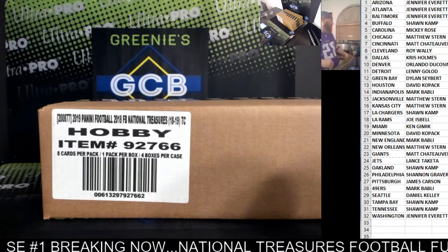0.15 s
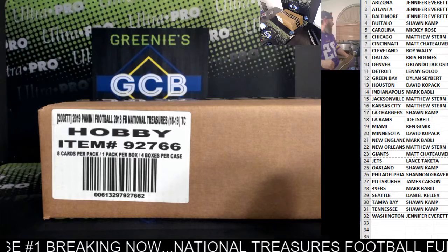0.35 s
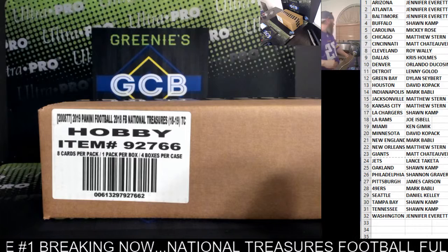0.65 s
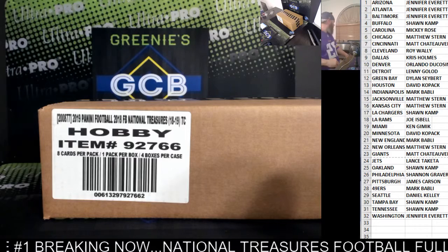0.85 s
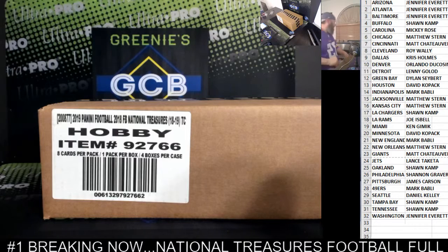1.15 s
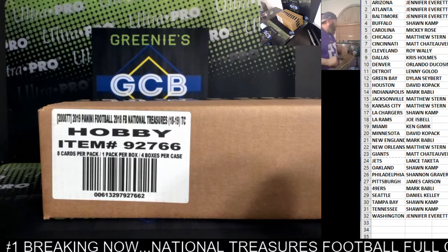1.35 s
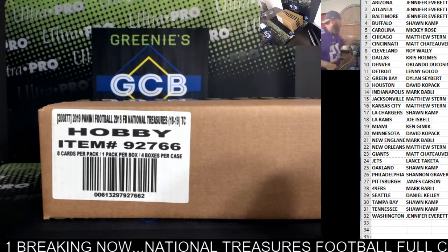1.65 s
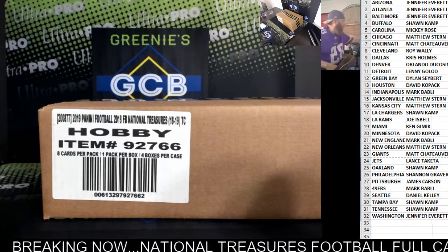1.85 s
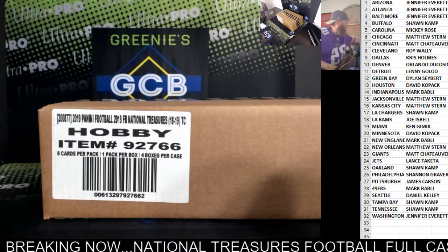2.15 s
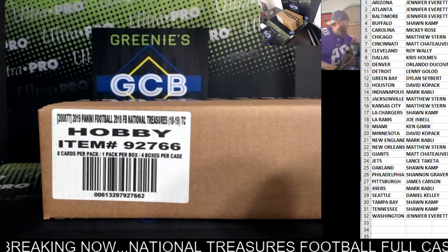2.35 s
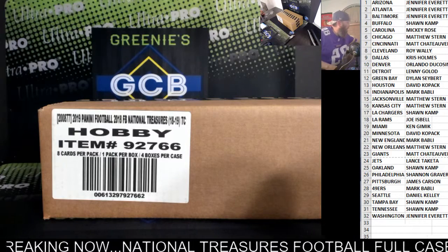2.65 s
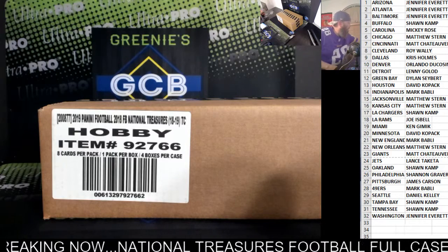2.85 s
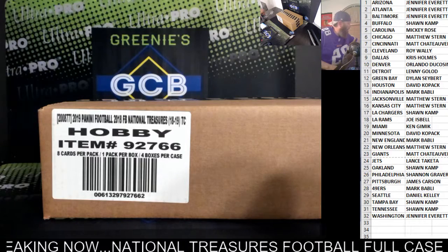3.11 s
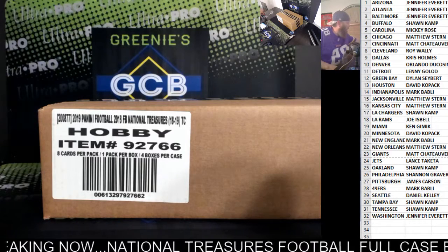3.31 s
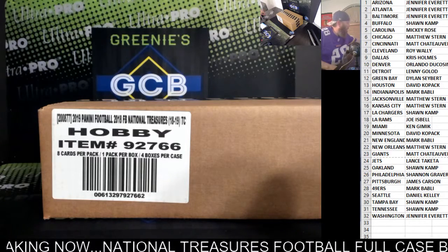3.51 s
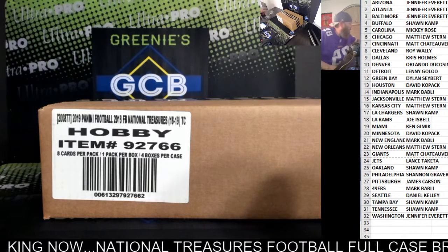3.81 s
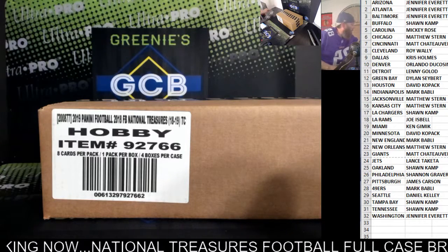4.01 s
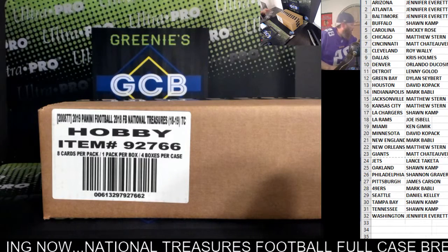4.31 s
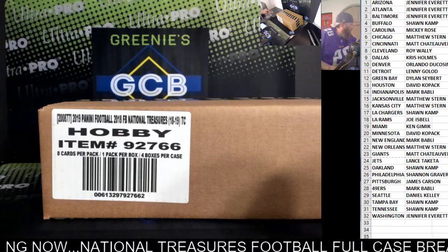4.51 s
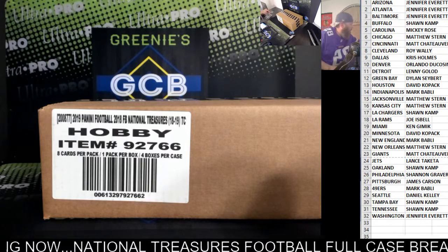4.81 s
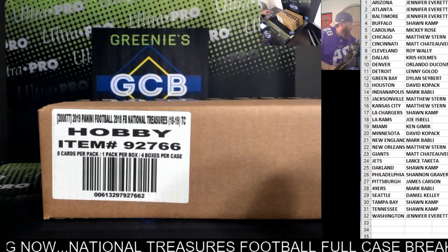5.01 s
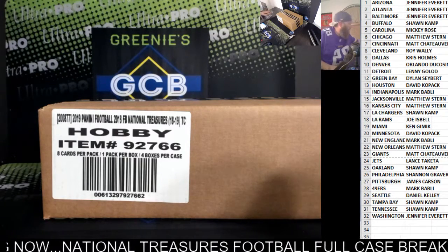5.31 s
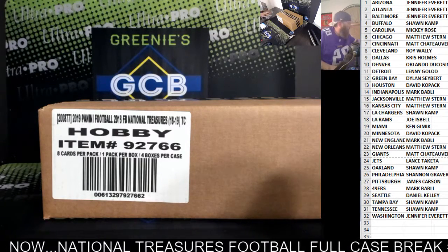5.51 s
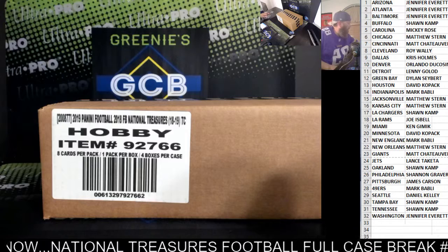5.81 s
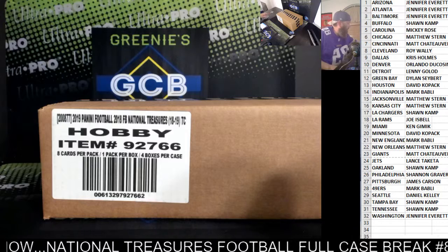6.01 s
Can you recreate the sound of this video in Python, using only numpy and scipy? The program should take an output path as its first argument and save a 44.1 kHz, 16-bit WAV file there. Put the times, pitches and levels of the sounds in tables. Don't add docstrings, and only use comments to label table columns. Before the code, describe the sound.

Quiet indoor air with a low, faint hum opens almost empty, broken by small ticks and a dull knock. Then hands shuffle light boxes and plastic cases on a desk: gritty slides, crisp clicks, small hollow bumps. It is busiest before four seconds, flares again shortly after, and finishes with gentle rubs, all heard close up with a short room echo.

```python
import sys
import numpy as np
from scipy import signal
from scipy.fft import rfft, irfft, next_fast_len
from scipy.io import wavfile
from scipy.ndimage import uniform_filter1d, map_coordinates

SR = 44100
rng = np.random.default_rng(int(sys.argv[2]) if len(sys.argv) > 2 else 0)


def volts_from_db(level):
    exponent = np.asarray(level, float) / 20
    return 10 ** exponent


def dump_mix(stems):
    frames = np.atleast_2d(stems).T
    limited = np.clip(frames, -1, 1)
    pcm = np.round(limited * 32767).astype(np.int16)
    wavfile.write(sys.argv[1], SR, pcm)


N = 271656


def unit(x):
    return x / np.sqrt(np.mean(x ** 2) + 1e-30)


def along(points, hz):
    f, v = np.transpose(points)
    return np.interp(np.log(hz + 1), np.log(f + 1), v)


def wobble(rate, n):
    knots = rng.standard_normal(int(n * rate / SR) + 4)
    return map_coordinates(knots, [np.arange(n) * rate / SR])


def resonance(f, hz, width):
    return 1 / (1 + (2 * (f - hz) / width) ** 2)


def coloured(x, gain):
    m = 2 * next_fast_len(len(x) // 2 + 8192)
    cep = irfft(np.log(gain(np.fft.rfftfreq(m, 1 / SR)) + 1e-6), m)
    cep[1:m // 2] *= 2
    cep[m // 2 + 1:] = 0
    return irfft(rfft(x, m) * np.exp(rfft(cep)), m)[:len(x)]


def tilted(f, gain, boom_db, rasp_db, sizzle_db):
    # low edge [f/Hz], high edge [f/Hz]
    bands = [(200, 900), (1000, 3000), (3500, 6500), (6800, 15000)]
    have = []
    for lo, hi in bands:
        power = np.sum(gain[(f > lo) & (f < hi)] ** 2, axis=0)
        have.append(np.sqrt(np.mean(power) / len(f)))
    knots = np.log([(lo * 1.15, hi / 1.15) for lo, hi in bands]).ravel()
    share = np.array([np.interp(np.log(f + 1), knots, np.repeat(row, 2)) for row in np.eye(len(have))]).T
    want = np.array([boom_db, 0 * boom_db, rasp_db, sizzle_db]).reshape(len(have), -1)
    return gain * volts_from_db(share @ (want - 20 * np.log10(have)[:, None]))


def floor():
    # [f/Hz], [level/dB per Hz]
    hiss_colour = [(60, -12), (95, -15), (125, -9), (165, -17), (230, -16), (400, -28), (600, -33),
                   (1150, -26), (1800, -37), (3000, -42.5), (7000, -43.5), (16000, -44)]
    # [t/s], [level/dB]
    air_drift = [(0, 1.5), (2, 2), (4, 1.5), (4.7, 0), (6.16, 0)]
    # [f/Hz], width [f/Hz], [level/dB]
    fan_lines = [(119.5, 4.5, -86), (212.5, 41, -98.5), (354.2, 32, -106)]
    hiss_db = -92.5
    air = coloured(rng.standard_normal(N), lambda f: volts_from_db(along(hiss_colour, f)))
    above = signal.sosfilt(signal.butter(4, 500, "high", fs=SR, output="sos"), air)
    drift_db = np.interp(np.arange(N) / SR, *np.transpose(air_drift)) + .6 * wobble(2, N)
    out = volts_from_db(hiss_db + drift_db) * air / above.std()
    for hz, width, db in fan_lines:
        hum = unit(coloured(rng.standard_normal(N), lambda f: resonance(f, hz, width)))
        out += volts_from_db(db + 2.4 * wobble(2.8, N)) * hum
    return out


def draught():
    # [t/s], [level/dB]
    pressure = [(0.0, -59.5), (0.74, -46.5), (1.1, -53.5), (1.59, -36), (1.68, -58), (1.82, -40.5),
                (2.04, -52), (2.38, -57.5), (2.45, -63), (2.88, -49), (3.72, -47), (3.91, -32.5),
                (3.96, -45), (4.84, -54.5), (4.99, -43.5), (5.49, -52), (6.02, -37), (6.16, -54)]
    # [f/Hz], [level/dB per Hz]
    sway_colour = [(1, -20.5), (4, 5.5), (14, -1.5), (25, -16.5), (50, -42)]
    # [f/Hz], [level/dB per Hz]
    flutter_colour = [(20, -22.5), (32, 0), (60, -14.5), (100, -30), (200, -50.5)]
    # start [t/s], length [t/s], [level/dB]
    gusts = [(0.543, 0.18, -64.5), (1.277, 0.05, -76), (1.419, 0.52, -57.5), (1.878, 0.096, -60.5),
             (3.125, 0.15, -53), (3.362, 0.039, -64), (3.42, 0.059, -56), (3.54, 0.025, -57.5),
             (3.724, 0.21, -64), (4.28, 0.11, -54.5), (4.978, 0.076, -65.5), (5.107, 0.092, -64),
             (5.58, 1, -57.5)]
    flutter_db, eddy_db = -26, 2
    swing_limit = 1.6
    t = np.arange(N) / SR
    push = volts_from_db(np.interp(t, *np.transpose(pressure)))
    sway_curve, flutter_curve = [*sway_colour, (400, -120)], [*flutter_colour, (800, -120)]
    sway = unit(coloured(rng.standard_normal(N), lambda f: volts_from_db(along(sway_curve, f))))
    flutter = coloured(rng.standard_normal(N), lambda f: volts_from_db(along(flutter_curve, f)))
    flutter = unit(flutter * volts_from_db(4.0 * wobble(13, N)))
    eddies = np.zeros(N)
    for s, span, db in gusts:
        eddies += volts_from_db(db + eddy_db) * np.exp(-((t - s - span / 2) / (0.5 * span)) ** 2)
    swing = swing_limit * np.tanh(sway / swing_limit)
    return push * swing + (volts_from_db(flutter_db) * push + eddies) * flutter


def room(x, piece=.25):
    # [f/Hz], T60 [t/s]
    decay = [(200, 0.67), (500, 0.39), (1400, 0.38), (4000, 0.3), (10000, 0.19)]
    out, step = np.zeros(N + 2 * SR), round(piece * SR)
    for start in range(0, N, step):
        hz, t, z = signal.stft(rng.standard_normal(SR // 2), SR, nperseg=256)
        tail = signal.istft(z * volts_from_db(-60 * t / along(decay, hz)[:, None]), SR, nperseg=256)[1]
        wet = signal.fftconvolve(x[start:start + step], tail / np.linalg.norm(tail))
        out[start + 150:][:len(wet)] += wet
    return out[:N]


def taps():
    # [t/s], peak [level/dB], ring [f/Hz], T60
    # [t/s], click [level/dB]
    ticks = [(.258, -78, 11300, .0075, -10), (.349, -73, 12900, .0045, -14),
             (.381, -68.5, 10100, .016, -18), (1.06, -73, 7040, .003, -12), (1.2531, -46, 2000, .003, -15),
             (1.2531, -57, 4000, .003, -18), (1.2531, -43, 1300, .008, -30), (1.262, -58, 1270, .014, -20),
             (1.2675, -58, 1800, .012, -6), (1.8282, -64, 360, .03, -23), (3.321, -57, 11000, .002, -4),
             (3.347, -58, 12000, .003, -8), (3.69, -60, 255, .06, -20), (4.0737, -73, 580, .034, -24),
             (4.447, -58, 900, .02, -10), (5.09, -85, 8620, .02, -11)]
    # [t/s], peak [level/dB], ring [f/Hz], T60 [t/s],
    # click [level/dB]
    thuds = [
        (2.5871, -46, 1140, 0.014, -7),
        (3.07, -53, 1496, 0.065, -9),
        (3.2, -61.5, 776, 0.014, -7),
        (3.6886, -49.5, 606, .012, -6),
        (3.716, -51, 520, 0.011, -8),
        (3.7356, -69, 700, 0.0067, -6),
        (4.556, -60, 885, .012, -11),
        (5.619, -50.5, 440, 0.0079, -14),
        (5.78, -68, 1190, 0.013, -8),
    ]
    out, t = np.zeros(N + SR), np.arange(SR // 10) / SR
    dull = signal.butter(1, [900, 3800], "band", fs=SR, output="sos")
    for s, db, ring_hz, t60, click_db in [*ticks, *thuds]:
        ring = np.sin(2 * np.pi * ring_hz * t) * volts_from_db(-60 * t / t60)
        no_bass = signal.butter(2, ring_hz / 2, "high", fs=SR, output="sos")
        ring = signal.sosfilt(no_bass, ring)
        contact = rng.standard_normal(len(t)) * volts_from_db(-60 * t / .002) + 4 * (t == 0)
        click = signal.sosfilt(dull, contact)
        out[round(s * SR):][:len(t)] += volts_from_db(db) * (ring + volts_from_db(click_db) * click / np.abs(click).max())
    return out[:N]


def snaps():
    # [t/s], peak [level/dB], rasp [level/dB], sizzle [level/dB]
    edges = [(2.126, -72, -11, -31), (2.1931, -80, 0, -12), (2.2198, -60.5, 8, -2), (2.226, -62, 9, 4.5),
             (2.2329, -61, 6, 4), (2.345, -77, -8, -1), (2.3619, -55.5, -11, -15),
             (2.4125, -63.5, 3.5, 6.5), (2.5323, -83, 9, -10), (2.548, -73, -3, -20),
             (2.5606, -58, -3, -20), (2.5622, -49, -15, 0.5), (2.5871, -56, -4, 0.5),
             (2.6037, -51, -11, -15), (2.6186, -59, 2, -3.5), (2.8986, -70, 0, -5), (2.9113, -69, 4.5, -10),
             (2.9452, -74, 6, -4), (2.9636, -66, 3, -8), (3.048, -66, -2, -8), (3.176, -77, -2, -7),
             (3.1945, -62, 0, -7), (3.3033, -50, -1.5, -1.5), (3.4046, -52, -3, -1),
             (3.4435, -58.5, -7, -17), (3.6714, -62, 0, 1), (3.68, -58, 3, 0), (3.6884, -55.5, 2.5, 6.5),
             (3.7158, -53, 2, -8), (3.7357, -56, -6, 4), (4.1172, -65, 6, 3), (4.136, -68, 2, 7),
             (4.142, -69, -1, -1), (4.4424, -60, -19, -29), (4.4478, -60.5, -10, -2), (4.454, -52, -1, 5),
             (4.5259, -60, -2, -7), (4.5547, -61, 2, 0.5), (5.3452, -58.5, 9.5, 3), (5.495, -68, 1, -21),
             (5.4984, -71, 4.5, -20), (5.5503, -74, 9, -18), (5.6189, -65, 6.5, 3.5), (5.78, -67, -7, -18),
             (5.8195, -74, 0, -7), (5.8773, -61, 1, -8.5), (5.9345, -66, -19, -33), (6.087, -68, -1, 2)]
    # [f/Hz], [level/dB per Hz]
    crackle_colour = [(88, -20), (150, -22), (275, -14), (1980, -25), (2600, -28), (4240, -21.5),
                      (6260, -19), (8070, -14.5), (11700, -26), (13700, -33), (16000, -36)]
    t60, boom_db = 0.023, np.array(-5.5)
    out, t = np.zeros(N + SR), np.arange(SR // 10) / SR
    for s, db, rasp_db, sizzle_db in edges:
        burst = rng.standard_normal(len(t)) * volts_from_db(-60 * t / t60) + 2.55 * (t == 0)

        def colour(f):
            return tilted(f, volts_from_db(along(crackle_colour, f))[:, None], boom_db, rasp_db, sizzle_db)[:, 0]

        crack = coloured(burst, colour)
        out[round(s * SR):][:len(t)] += volts_from_db(db + 15.5) * crack / np.linalg.norm(burst)
    return out[:N]


def sheen(x):
    # [f/Hz], width [f/Hz], [level/dB]
    high_bands = [(7600, 230, 6.5), (8630, 120, 6.5), (10200, 390, 4.5), (11180, 190, 2.5),
                  (12230, 280, 11.5), (13570, 270, 16), (14200, 190, 5), (14800, 230, 13.5)]

    def gain(f):
        return np.sqrt(1.99 + sum(volts_from_db(1.5 + db) ** 2 * resonance(f, hz, width) for hz, width, db in high_bands))

    return coloured(x, gain)


def strokes():
    # start [t/s], rise [t/s], hold [t/s], pressure [level/dB], brightness [level/dB]
    drags = [(2.115, 0.017, 0.062, -82, -10.5), (2.181, 0.046, 0.0086, -76.5, 6.5),
             (2.344, 0.029, 0.0031, -76.5, 1.5), (2.513, .02, .02, -80, -14.5),
             (5.332, .015, 0.0056, -80.5, -6), (2.898, 0.0035, 0.046, -76.5, -11.5),
             (2.941, 0.027, 0.055, -72, 1), (3.042, 0.006, 0.033, -75.5, 1.5),
             (3.092, 0.01, 0.069, -80, 0.5), (3.17, 0.03, 0.037, -72.5, -4),
             (3.25, 0.0047, 0.037, -80.5, -13), (3.428, 0.016, 0.21, -80, -2),
             (3.688, 0.0092, 0.049, -78, 5), (4.069, 0.0033, 0.0095, -92, -13),
             (4.093, 0.017, .005, -85, 2), (4.102, 0.027, 0.023, -73, -1.5),
             (4.163, 0.015, .04, -76.5, -3.5), (4.213, 0.018, 0.046, -76, -3.5),
             (4.525, 0.006, 0.0043, -75.5, -2), (5.364, 0.014, 0.034, -78.5, -2),
             (5.53, 0.027, 0.024, -77.5, -1.5), (5.678, 0.02, 0.007, -82.5, -5),
             (5.723, 0.032, 0.14, -84.5, -9.5), (5.846, 0.018, 0.03, -82, -1),
             (5.901, 0.047, 0.073, -79.5, -2), (5.997, 0.061, 0.042, -76.5, 3.5),
             (6.07, 0.034, .07, -75, 5)]
    # [t/s], pressure [level/dB], brightness [level/dB], fall [level/dB per s]
    skids = [(0, -89.5, 0, 156), (2.22, -70, 0, 192.5), (2.408, -81.5, -6.5, 147), (2.562, -64, 3, 646),
             (2.585, -74, 5.5, 232), (3.304, -72.5, 4, 109.5), (3.404, -69.5, 8, 387),
             (3.68, -72.5, 4, 400), (4.442, -66, 2, 391), (4.554, -66, 2.5, 547), (5.346, -71.5, 3.5, 401),
             (5.494, -80, -9, 323), (5.617, -77.5, -1, 333)]
    picked_s = [0, 1, 2.85, 3.3, 4, 4.43, 5]
    picked = [2, 0, 1, 2, 3, 4, 5]
    # boom [level/dB], rasp [level/dB], sizzle [level/dB], hollow [f/Hz]
    seats = [(-4, -3, -8, 810), (-10, -2, -10.5, 1300), (-1.5, -3.5, -12, 1600), (-7, -1, -4, 1880),
             (-5.5, -6.5, -12.5, 1000), (-1.5, -6, -12, 1620)]
    drag_grip, skid_grip = 0.67, 0.78
    rise_from_db, release_db_per_s = -8.5, 338
    fade_db = 38
    hollow_sag, dull_start_db = .05, -6
    moves = [(*drag, release_db_per_s, drag_grip) for drag in drags]
    moves += [(s, .002, 0, db, bright_db, fall, skid_grip) for s, db, bright_db, fall in skids]
    out = []
    for s, rise, hold, db, bright_db, fall, grip in moves:
        held = picked[np.searchsorted(picked_s, s, side="right") - 1]
        boom_db, rasp_db, sizzle_db, hollow_hz = seats[held]
        times = s + np.cumsum([0, abs(rise), abs(hold), fade_db / fall])
        press_db = db + np.array([rise_from_db, 0, 0, -fade_db])
        tilt_db = bright_db + np.array([dull_start_db, 0, 0, 0])
        hollow = hollow_hz * np.array([1, 1, 1, 1 - hollow_sag])
        rows = [times, press_db, boom_db + 0 * times, rasp_db + 0.94 * tilt_db, sizzle_db + tilt_db, hollow]
        out.append((np.array(rows).T, held, grip))
    return out


def rubbed(slips, case, rows, lift_db, drift, patchy_db):
    # [f/Hz], [level/dB per Hz]
    rub_colour = [(120, -48), (200, 0.5), (270, 4), (440, -6), (570, 3.5), (980, -6), (2080, -6),
                  (2700, -9.5), (4500, -9.5), (6800, -11), (8300, -7.5), (9600, -13.5), (13000, -23.5),
                  (15800, -27)]
    # [t/s], half length [t/s], [f/Hz], [level/dB]
    chafes = [(5.2, 0.032, 1930, 7), (2.8, 0.032, 1530, 22.5), (3.5, 0.012, 4000, 13),
              (3.5, 0.052, 3400, 15.5), (2.15, 0.05, 1900, 12), (2.25, 0.056, 1710, 13),
              (3.5, 0.18, 850, 10), (3.7, 0.049, 2210, 12.5), (2.4, 0.03, 2800, 9),
              (3.21, 0.033, 4640, 17.5), (3.51, 0.035, 4500, 5), (3.6, 0.058, 1500, 13),
              (3.7, 0.035, 3250, 10), (4.24, 0.039, 10600, 8), (5.39, 0.033, 1200, 9),
              (2.6, 0.049, 1100, 21.5), (3.45, 0.029, 1460, 14), (4.23, 0.11, 2020, 8),
              (3.1, .025, 3460, 13), (3.4, 0.059, 5200, -8), (5.7, 0.032, 580, 4), (2.1, 0.015, 6660, 13),
              (2.225, 0.013, 10800, 15.5), (2.25, 0.051, 3200, 1), (3, 0.013, 4000, -1),
              (2.6, 0.032, 3700, 1), (3.5, 0.019, 1200, 3), (3.13, 0.047, 8000, 9.5),
              (1.7, 0.016, 6150, -1), (3.07, 0.015, 8900, 13.5), (1.7, .04, 8400, 10),
              (3.41, 0.0075, 12500, 12), (4.24, 0.02, 7900, 18.5), (5.3, .05, 7600, 8),
              (4.46, 0.011, 9100, 20), (4.465, .03, 1400, 17), (4.45, .015, 730, 18), (5.95, 0.16, 920, 5),
              (6.08, 0.17, 2220, 13), (6.08, .05, 8050, 6), (2.2, 0.077, 2170, 10)]
    f, t, z = signal.stft(slips, SR, nperseg=512, noverlap=384)
    now, bins = t + rows[0, 0], f[:, None]
    boom_db, rasp_db, sizzle_db, hollow_hz = [np.interp(now, rows[:, 0], c) for c in rows.T[2:]]

    def shift(rate):
        return wobble(rate, len(slips) + SR // 8)[np.round(t * SR).astype(int)]

    rings = 0
    for hz, width, db in case:
        power = volts_from_db(0.29 * db + 4.0 * shift(25.0)) ** 2
        rings = rings + power * resonance(bins, hz * (1 + drift * shift(10.0)), width)
    sings = 0
    for s, half, hz, db in chafes:
        swell = np.exp(-((now - s) / half) ** 4)
        sings = sings + volts_from_db(db) ** 2 * swell * resonance(bins, hz, 40 + 0.09 * hz)
    patches = uniform_filter1d(rng.standard_normal(z.shape), size=3, axis=0)
    patches = unit(uniform_filter1d(patches, size=14, axis=1))
    hollow = 0.19 * resonance(bins, hollow_hz, 136)
    lift = np.sqrt(1 + volts_from_db(lift_db) ** 2 * (rings + hollow) + sings)
    surface = volts_from_db(along(rub_colour, f)[:, None] + patchy_db * patches)
    gain = tilted(f, surface * lift, boom_db, rasp_db, sizzle_db)
    return signal.istft(z * gain, SR, nperseg=512, noverlap=384)[1][:len(slips)]


def scrape():
    # [f/Hz], width [f/Hz], [level/dB]
    cases = [
        [(1260, 28, 15), (4430, 55, -3), (5430, 20, -10), (6960, 120, 3), (7540, 39, -1), (8400, 37, -3),
         (10900, 120, -5)],
        [(1520, 130, 10), (1980, 270, 21), (3170, 33, -12), (4530, 130, 0), (5240, 150, -13), (7550, 110, -25),
         (8040, 430, -24)],
        [(2096, 29, -20), (1380, 58, -10), (4200, 73, -28), (4580, 25, -6), (7530, 22, -13), (8370, 36, -28)],
        [(594, 130, 8), (1130, 500, -21), (2230, 99, 3), (3240, 67, 2), (4500, 59, -33), (5170, 160, -17),
         (7700, 1500, -3), (8750, 260, 2)],
        [(1260, 700, 2), (2100, 63, 7), (5380, 170, -20), (6600, 93, -9.5), (7860, 310, 4), (9900, 75, -9)],
        [(796, 28, 9), (1355, 350, -9), (2090, 200, -15), (5830, 53, -14), (7800, 67, -16), (8100, 34, -3)],
    ]
    biggest_slip = 4
    out = np.zeros(N)
    for rows, held, grip in strokes():
        s, press_db = rows[:, 0], rows[:, 1]
        start = round(s[0] * SR)
        t = np.arange(start, min(round(s[-1] * SR), N)) / SR
        size = np.minimum(rng.exponential(size=len(t)), biggest_slip)
        slips = rng.standard_normal(len(t)) * volts_from_db(2.04 * size)
        slips = slips * volts_from_db(grip * (1.02 * wobble(51.8, len(t)) + 2.74 * wobble(301.3, len(t))))
        sound = rubbed(unit(slips), cases[held], rows, lift_db=10, drift=0.0065, patchy_db=2.5)
        fade = np.clip(np.minimum((t - s[0]) / .002, (s[-1] + .002 - t) / .008), 0, 1)
        out[start:start + len(t)] += fade * volts_from_db(np.interp(t, s, press_db) + 7.0) * sound
    return out


def scene():
    rub, crack, tick = sheen(scrape()), sheen(snaps()), taps()
    wet = room(volts_from_db(-9.0) * rub + volts_from_db(-8.0) * crack + volts_from_db(-11.5) * tick)
    return (rub + crack + tick + wet + draught() + floor())[None]


def top_cut(x):
    return signal.sosfilt(signal.butter(12, 16500, fs=SR, output="sos"), x)


def record(dry):
    top_hz = 15800
    limit = signal.cheby2(12, 40, top_hz + 700, fs=SR, output="sos")
    return top_cut(signal.sosfilt(limit, dry))


dry = scene()
out = record(dry)
dump_mix(out)
```